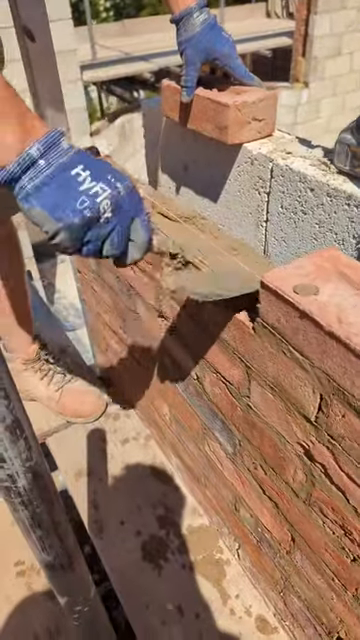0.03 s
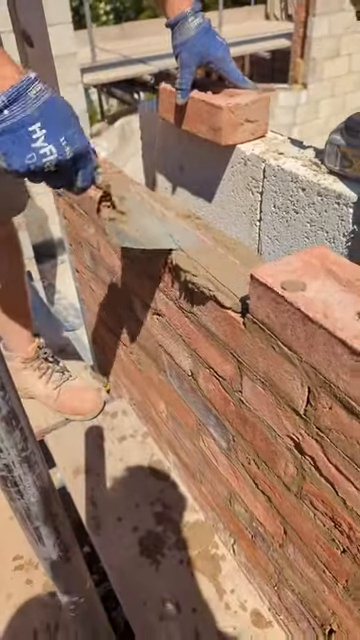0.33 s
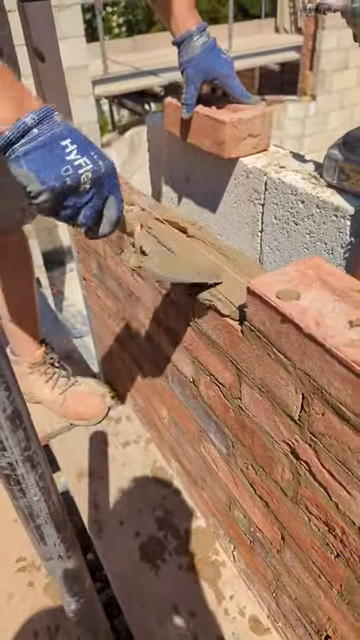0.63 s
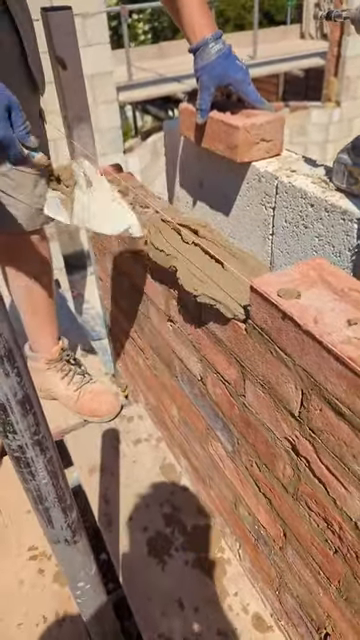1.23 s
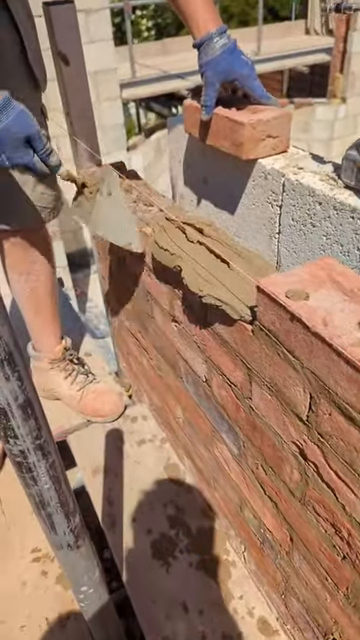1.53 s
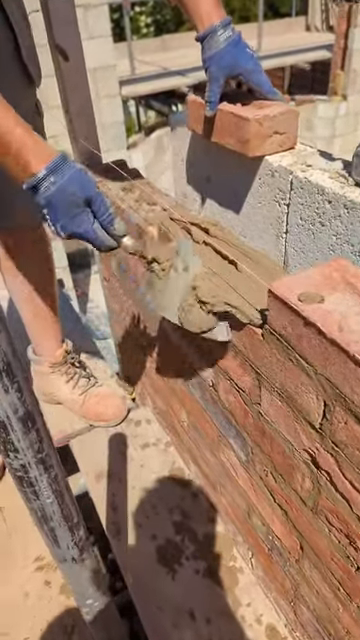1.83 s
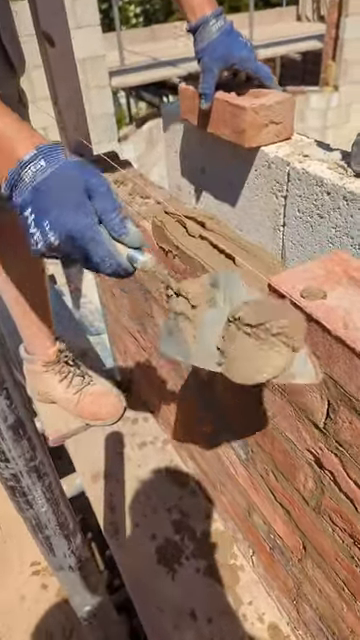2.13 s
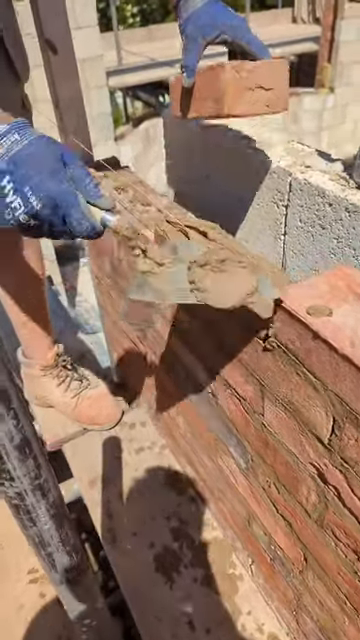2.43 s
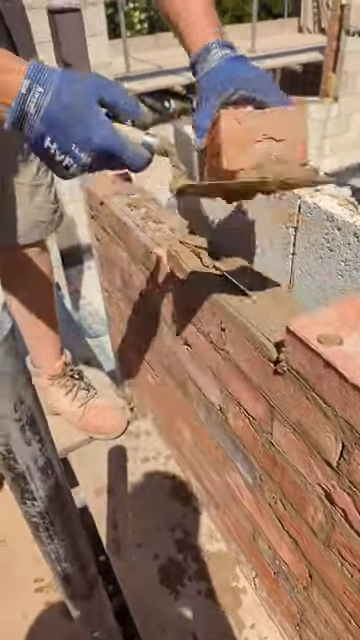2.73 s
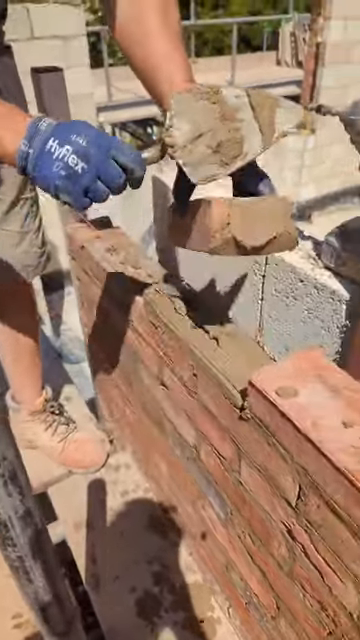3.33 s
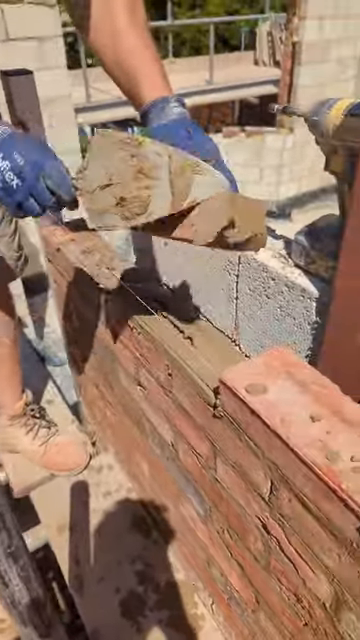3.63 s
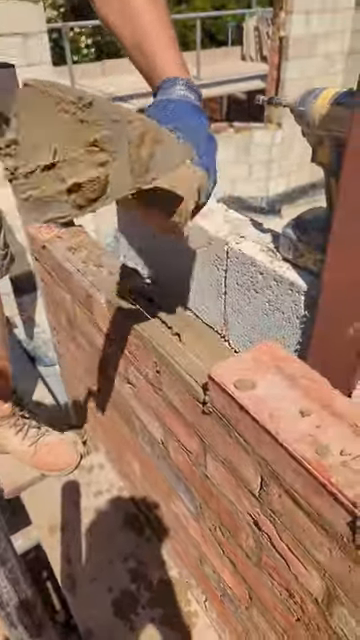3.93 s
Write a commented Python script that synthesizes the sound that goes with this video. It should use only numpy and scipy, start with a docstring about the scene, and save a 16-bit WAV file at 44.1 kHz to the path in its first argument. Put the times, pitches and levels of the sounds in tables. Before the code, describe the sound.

A steel trowel slides softly through wet mortar, scrapes grittily along a brick wall, then dabs a brick a few times and gives one short scrape. Outdoors, wind rumbles on the microphone over faint distant traffic.

```python
"""An outdoor wall, a bricklayer at work. The trowel slides softly through wet mortar, scrapes the spare
mortar off the bricks, then butters a brick in a few gritty dabs and one short scrape. Sand cracking
under the steel makes the hiss and drives the blade's resonances; the held brick knocks under the dabs.
Wind rumbles on the microphone, with one dull thump, over the wash of distant traffic."""
import sys
import numpy as np
from scipy import signal
from scipy.fft import rfft, irfft, next_fast_len
from scipy.io import wavfile

SR = 44100
rng = np.random.default_rng(int(sys.argv[2]) if len(sys.argv) > 2 else 0)


def digitize_waveform(pressure):
    """Quantize a signal to 16-bit integers and store it at the path in sys.argv[1].

    Rows of a 2-D input are taken as channels; values are limited to [-1, 1].
    """
    field = np.atleast_2d(pressure).T
    bounded = np.clip(field, -1, 1)
    quanta = np.round(bounded * 32767).astype(np.int16)
    wavfile.write(sys.argv[1], SR, quanta)


N = 176400
T = np.arange(N) / SR

# spectrum of grit breaking against brick: freq_hz, level_db
CRUNCH_SPECTRUM = [(200,4),(500,8.5),(900,9.5),(2500,3.5),(4900,2),(6200,-1.5),(7900,0),(9000,-3),(11600,-1.5),(13000,-17.5),(16000,-17.5)]


def from_db(db):
    """Decibels to gain."""
    return 10 ** (np.asarray(db) / 20)


def rms_one(x):
    """Scale to rms 1."""
    return x / np.sqrt(np.mean(x ** 2) + 1e-20)


def in_time(rows):
    """Each column of a curve at every sample."""
    times, *columns = np.transpose(rows)
    return [np.interp(T, times, column) for column in columns]


def stroke(rows):
    """Gains of a level curve, silent outside it."""
    return [from_db(db) * (T >= rows[0][0]) * (T <= rows[-1][0]) for db in in_time(rows)]


def colour(x, spectrum, tilt_db=0):
    """Causal EQ, tilted by tilt_db per octave above about 1 kHz; keeps the power of white noise."""
    size = 2 * next_fast_len(len(x) // 2 + 4096, True)
    octave = np.log2(np.maximum(np.fft.rfftfreq(size, 1 / SR), 1))
    hz, db = np.transpose(spectrum)
    fade_db = 20 * np.minimum(octave - np.log2(hz[0]), 0) - 20 * np.maximum(octave - np.log2(hz[-1]), 0)
    curve_db = np.interp(octave, np.log2(hz), db) + fade_db + tilt_db * np.maximum(octave, 10)
    cepstrum = irfft(np.log(rms_one(from_db(curve_db)) + 1e-7))
    cepstrum[1:size // 2] *= 2   # fold to minimum phase
    cepstrum[size // 2 + 1:] = 0
    return irfft(rfft(x, size) * np.exp(rfft(cepstrum)))[:len(x)]


def resonate(x, hz, width_hz):
    """A resonance that keeps the power of white noise."""
    r = np.exp(-np.pi * width_hz / SR)
    feedback = [1, -2 * r * np.cos(2 * np.pi * hz / SR), r * r]
    return signal.lfilter(np.sqrt((1 - r * r) / 2) * np.array([1, 0, -1]), feedback, x + 1e-18)


def glide(x, hz, width_hz):
    """A steep-sided resonance whose centre may move; rms 1."""
    turn = np.exp(2j * np.pi * np.cumsum(hz * np.ones(N)) / SR)
    r = np.exp(-np.pi * width_hz / SR)
    return rms_one((signal.lfilter([1], [1, -2 * r, r * r], x / turn) * turn).real)


def drift(rate_hz):
    """A smooth random wander; rms 1."""
    r = np.exp(-2 * np.pi * rate_hz / SR)
    return rms_one(signal.lfilter([1], [1, -2 * r, r * r], rng.standard_normal(N + SR))[SR:])


def noise(spectrum):
    """Steady coloured noise; rms 1."""
    return rms_one(colour(rng.standard_normal(N + SR), spectrum)[SR:])


def wind():
    """Wind on the microphone: lumpy rumble with a low drone in it, flutter and short buffets."""
    # swell that rumble and flutter follow: time_s, level_db
    swell = [(0,-34.5),(.55,-41),(1.0,-34.5),(1.9,-35.5),(2.65,-31),(3.1,-37),(4,-39)]
    # single buffets: centre_s, half_length_s, rumble_db, flutter_db
    gusts = [(1.085,0.012,-21.5,-32),(1.451,0.022,-30,-50),(1.62,0.03,-28.5,-42.5),(1.872,0.051,-30.5,-40),(1.958,0.0078,-22,-58),(2.04,0.015,-27,-52),(2.19,0.0078,-29.5,-41),(2.264,0.016,-31,-53),(2.568,0.04,-38.5,-39),(2.74,0.01,-29,-53)]
    # the deep rumble: freq_hz, level_db
    rumble_spectrum = [(12,0.5),(25,-4),(50,-4),(70,-10.5),(100,-16.5),(160,-22),(400,-60)]
    # the flutter above it: freq_hz, level_db
    flutter_spectrum = [(50,-15),(85,3),(110,2),(160,-6),(230,-7.5),(330,-18.5),(700,-45)]
    swell_db, = in_time(swell)
    gust_rumble, gust_flutter = sum(from_db([[low_db], [high_db]]) * np.exp(-.5 * ((T - s) / half) ** 2)
                                    for s, half, low_db, high_db in gusts)
    rumble_gain = from_db(swell_db - 3.5)
    flutter_gain = from_db(0.69 * swell_db - 22 - drift(rate_hz=4.7))
    drone = from_db(-4.5) * rumble_gain * glide(rng.standard_normal(N), hz=54.7, width_hz=6.5)
    rumble = np.hypot(rumble_gain, gust_rumble) * noise(rumble_spectrum)
    flutter = np.hypot(flutter_gain, gust_flutter) * noise(flutter_spectrum)
    return rumble + flutter + drone


def traffic():
    """Distant traffic blurs into a smooth, dull wash."""
    # tone of the wash: freq_hz, level_db
    spectrum = [(60,-8),(200,1.5),(420,-1),(650,-4),(850,-8.5),(1300,-10),(2000,-18),(3000,-26.5),(4300,-34.5),(5500,-44),(8000,-56),(16000,-63.5)]
    # its slow swell: time_s, level_db
    swell = [(0,-50),(.8,-51),(1.5,-50.5),(2.5,-51),(3.0,-48),(3.35,-48),(3.7,-49),(4,-50)]
    return from_db(in_time(swell)[0]) * noise(spectrum)


def sand(grains_per_s=6000, spread_db=2, judder_db=2):
    """Grains of many sizes crack under the blade, bunched by its sticking and slipping; rms 1."""
    size_db = spread_db * np.minimum(rng.exponential(1, N), 4)
    stick_slip_db = judder_db * np.clip(drift(rate_hz=420), -2, 2)
    cracks = from_db(size_db + stick_slip_db) * rng.choice([-1, 1], N)
    return rms_one(cracks * (rng.random(N) < grains_per_s / SR))


def wet_mortar():
    """Soft sandy hiss as the blade furrows the mortar bed."""
    # slides, with fades timed per 20 dB: start_s, hold_s, level_db, attack_s, release_s
    slides = [(0.0,0.18,-69,.01,0.049),(0.336,0.24,-79,0.046,0.055),(0.698,0.13,-74,0.068,0.13),(1.054,0.1,-77.5,.06,0.21),(2.462,0.05,-76.5,0.008,0.035),(3.37,0.05,-75,0.022,0.0083)]
    # wet hiss: freq_hz, level_db
    spectrum = [(1500,10.5),(2800,8.5),(4800,7),(6000,2.5),(8000,1.5),(10000,0.5),(12200,-3.5),(13500,-14.5),(16000,-19.5)]
    level = sum(from_db(db - 20 * np.maximum(s - T, 0) / attack
                        - 20 * np.maximum(T - s - hold, 0) / release)
                for s, hold, db, attack, release in slides)
    return level * colour(sand(), spectrum)


def crush(t, length_s, attack_s=0.0012, fall_t60_s=0.014, tail_t60_s=0.083):
    """Envelope of breaking grit: quick rise, hold, quick fall and a faint tail."""
    after = np.maximum(t - length_s, 0)
    decay = from_db(-60 * after / fall_t60_s) + from_db(-17 - 60 * after / tail_t60_s)
    return np.minimum(t / attack_s, 1) * decay


def crunches(peak_width_hz=1420):
    """The blade crushes grit against brick: short dry bursts, each with one broad peak."""
    # bursts: start_s, length_s, level_db, peak_hz, peak_relative_db, tilt_db_per_octave
    bursts = [(0.156,0.019,-53,2750,-9,-5.5),(0.182,.004,-70,10000,-9,2),(0.306,0.013,-76.5,3340,6.5,-5),(0.426,0.032,-73,5850,-6,-0.5),(0.569,0.011,-65,2700,-6,-8),(0.809,0.014,-62,4130,-4.5,0),
              (1.096,0.0081,-69,4900,-0.5,-1),(1.122,0.022,-58,4600,-25,-7.5),(1.436,0.0088,-73,3500,0,-4.5),
              (1.7202,0.0038,-47.5,1450,4.5,0),(1.882,0.013,-42,2400,-1,1),(2.456,0.003,-70,5250,-7,2.5),(2.996,0.02,-65,3800,0,-12),
              (3.363,0.0017,-60.5,3270,5,-7),(3.522,0.004,-47.5,2080,-2,-13)]
    out, t = np.zeros(N + SR), T[:SR // 8]
    for start_s, length_s, db, peak_hz, peak_db, tilt_db in bursts:
        grit, push = rng.standard_normal((2, len(t)))
        peak = rms_one(resonate(resonate(push, peak_hz, peak_width_hz), peak_hz, peak_width_hz))
        envelope, start = crush(t, length_s), int(start_s * SR)
        burst = colour(envelope * grit, CRUNCH_SPECTRUM, tilt_db) + from_db(peak_db) * envelope * peak
        out[start:start + len(t)] += from_db(db) * burst
    return out[:N]


def thump(start_s=1.068, rise_s=0.0098):
    """One dull, compact thump that swells and dies within a few cycles."""
    # low partials: pitch_hz, peak_db
    partials = [(72,-22.5),(118,-27),(175,-32.5),(240,-41.5)]
    age = np.maximum(T - start_s, 0) / rise_s
    tone = sum(from_db(db) * np.sin(2 * np.pi * hz * (T - start_s)) for hz, db in partials)
    return age * np.exp(1 - age) * tone


def coarse_sand(pings_per_s=1300, low_hz=537, high_hz=14280, longest_t60_s=.03):
    """Fine sand plus coarse grains that ping on the edge, the higher the shorter; rms 1."""
    chance, pitch, size = rng.random((3, N))
    onsets = np.flatnonzero(chance < pings_per_s / SR)
    hz = low_hz * (high_hz / low_hz) ** pitch[onsets, None]
    t, t60 = T[:int(longest_t60_s * SR)], longest_t60_s / np.cbrt(hz / low_hz)
    size_db = 2 * np.minimum(-np.log(size[onsets, None]), 2)
    rings = np.sqrt(hz) * from_db(size_db - 60 * t / t60) * np.sin(2 * np.pi * hz * t)
    pings = np.bincount((onsets[:, None] + np.arange(len(t))).ravel(), rings.ravel(), N)[:N]
    return rms_one(sand() + from_db(-2) * rms_one(pings))


def catching(grains, decay_s=.003, crack_db=18):
    """The edge catches on a coarse grain: it cracks, and the grinding surges and dies back."""
    # catches, against the steady scrape: time_s, surge_db
    catches = [(1.747,-6),(1.779,2),(1.8246,3),(1.85,-1),(1.9344,1),(1.99,-3),(2.053,-1),(2.061,-6),(3.7335,5),(3.746,3),(3.754,0),(3.775,5),(3.785,-4),(3.8045,2),(3.8225,-1)]
    times, surge_db = np.transpose(catches)
    cracks = np.bincount((times * SR).astype(int), from_db(surge_db), N)
    surge = signal.lfilter([1], [1, -np.exp(-1 / (decay_s * SR))], cracks + 1e-18)
    return grains * (1 + surge) + from_db(crack_db) * cracks


def blade(push, width_hz=60):
    """Grit rings the steel blade, which is damped by its load of mortar."""
    # blade modes: pitch_hz, relative_db
    modes = [(730,-6),(1330,-2),(2090,7),(2940,0),(3200,2.5),(4060,2.5),(4750,1),(5390,3),(7090,2.5),(8680,-7),(10050,0.5),(11600,-7.5)]
    gains = rms_one(from_db([db for _, db in modes])) / np.sqrt(len(modes))
    return sum((-1) ** k * gains[k] * resonate(push, hz, width_hz) for k, (hz, _) in enumerate(modes))


def wall_scrape(skip_half_length_s=0.0033):
    """Along the wall, sand hisses under the edge, rings the blade and drives its shifting resonances."""
    # faders for the sandy treble and the rasping mids: time_s, treble_db, middle_db
    levels = [(1.718, -69, -53), (1.722, -43.5, -45), (1.75, -54, -41.5), (1.796, -44, -39),
              (1.896, -44, -43), (1.9, -44, -47.5), (1.946, -44.5, -35.5), (1.978, -44, -42),
              (1.992, -44, -38), (2.066, -50, -40), (2.083, -63, -52)]
    # the rasp moves as the blade turns: time_s, pitch_hz
    rasp_path = [(1.72,1440),(1.76,1450),(1.80,1280),(1.87,1270),(1.96,1320),(2.0,1520),(2.06,1880)]
    # upper resonance, strong while the edge leads: time_s, pitch_hz, level_vs_rasp_db
    edge_path = [(1.72,3150,-10),(1.76,3100,-20),(1.79,3100,-7),(1.832,2980,-2),(1.89,2500,-11),(1.94,2900,-14),(2.06,2400,-16)]
    # the blade's low body sounds as mortar loads it: time_s, level_vs_rasp_db
    body_path = [(1.72,-19.5),(1.82,-17),(1.89,1),(1.96,-5),(2.06,-3.5)]
    # sand under steel: freq_hz, level_db
    grit_spectrum = [(400,-3),(1000,-7),(2500,6.5),(3500,-2.5),(4100,1),(5300,-1.5),(6200,-2.5),(7100,-2),(8200,-2.5),(11800,-5),(13000,-9.5),(16000,-16)]
    # the blade jumps and briefly loses contact: time_s, loss_db
    skips = [(1.8186,10.5),(1.9745,23),(2.0482,10),(2.071,19)]
    grains, (treble, middle) = catching(coarse_sand()), stroke(levels)
    contact = from_db(-sum(db * np.exp(-((T - s) / skip_half_length_s) ** 2) for s, db in skips))
    edge_hz, edge_db = in_time(edge_path)
    rasp = glide(grains, in_time(rasp_path)[0], width_hz=494)
    edge = from_db(edge_db) * glide(grains, edge_hz, width_hz=290)
    body = from_db(in_time(body_path)[0]) * glide(sand(), hz=657, width_hz=690)
    grit = from_db(-.5) * colour(coarse_sand(), grit_spectrum)
    steel = from_db(-4) * blade(catching(sand()))
    return contact * (treble * (grit + steel) + middle * (rasp + edge + body))


def wipe():
    """The blade drags sand lightly across the brick."""
    # one quick swish: time_s, level_db
    levels = [(3.035,-89),(3.045,-71),(3.054,-57),(3.058,-52),(3.095,-55.5),(3.103,-62),(3.13,-75.5),(3.15,-83.5)]
    # its tone: freq_hz, level_db
    spectrum = [(700,-11.5),(2000,8.5),(4500,3),(7000,0),(10500,-0.5),(13000,-8.5),(16000,-23.5)]
    return stroke(levels)[0] * colour(sand(), spectrum)


def dabs(contact_s=.009):
    """Steel meets brick: grit breaks and drives the loaded blade's damped resonances."""
    # the place of contact picks the ring: start_s, length_s, level_db, four times pitch_hz
    hits = [(3.1098,0.005,-36,3130,4700,8750,11470),(3.4116,0.0035,-41.5,1820,2350,4000,5940),(3.4166,0.0024,-37,1780,2720,4980,7000),
            (3.434,0.0037,-40,1730,2370,5300,9140),(3.45,0.0046,-47.5,1600,1900,4040,6700),(3.718,0.0043,-45,3500,4200,5700,6700)]
    out, t = np.zeros(N + SR), T[:SR // 8]
    for start_s, length_s, db, *pitches in hits:
        grit, push = crush(t, length_s) * rng.standard_normal((2, len(t)))
        push *= np.exp(-(t / contact_s) ** 4)
        ring = from_db(-4) * sum(resonate(push, hz, width_hz=360) for hz in pitches)
        start = int(start_s * SR)
        out[start:start + len(t)] += from_db(db) * (colour(grit, CRUNCH_SPECTRUM) + ring)
    return out[:N]


def knocks():
    """The held brick rings briefly under a dab."""
    # knocks: start_s, level_db
    hits = [(3.113,-52),(3.437,-46),(3.457,-39)]
    # brick modes: pitch_hz, relative_db, t60_s
    modes = [(482,0,0.07),(613,3.5,0.062),(1780,2,.03),(3990,-19.5,0.047)]
    out, t = np.zeros(N + SR), T[:SR // 8]
    ring = sum(from_db(db - 60 * t / t60) * np.sin(2 * np.pi * hz * t) for hz, db, t60 in modes)
    for start_s, db in hits:
        start = int(start_s * SR)
        out[start:start + len(t)] += from_db(db) * ring
    return out[:N]


def brick_scrape():
    """A short stroke over the held brick: sand hisses and drives a rasp of steady pitch."""
    # faders for grit and rasp: time_s, treble_db, middle_db
    levels = [(3.719, -60, -57), (3.733, -47.5, -43), (3.791, -46.5, -40), (3.841, -47.5, -59),
              (3.851, -53, -59)]
    # rasp resonances: pitch_hz, width_hz, relative_db
    resonances = [(1023,140,-3.5),(1530,280,-5),(1780,510,1),(2270,280,-3.5)]
    # sand between steel and brick: freq_hz, level_db
    grit_spectrum = [(400,-13),(1000,-12),(2500,0.5),(3200,0),(5000,2),(6200,-0.5),(7100,-0.5),(8000,-6),(9600,-4.5),(12000,-13.5),(16000,-26)]
    grains, (treble, middle) = catching(coarse_sand()), stroke(levels)
    rasp = rms_one(sum(from_db(db) * glide(grains, hz, width) for hz, width, db in resonances))
    grit = colour(catching(coarse_sand()), grit_spectrum)
    return treble * grit + from_db(-.5) * middle * rasp


def scene():
    """The trowel work with its near reflections, over a thump, wind and traffic; mono."""
    # bounces off wall and scaffold boards: delay_s, level_db
    reflections = [(.0018,-27),(.0071,-18.5),(0.0154,-30)]
    work = wall_scrape() + brick_scrape() + crunches() + dabs() + knocks() + wet_mortar() + wipe()
    echoes = sum(from_db(db) * np.interp(T - delay, T, work, left=0) for delay, db in reflections)
    return (work + echoes + thump() + wind() + traffic())[None]


def record(dry):
    """A steep low-pass cuts the top above 15.8 kHz."""
    return signal.sosfilt(signal.ellip(10, .2, 80, 15800, fs=SR, output="sos"), dry)


dry = scene()
out = record(dry)
digitize_waveform(out)
```